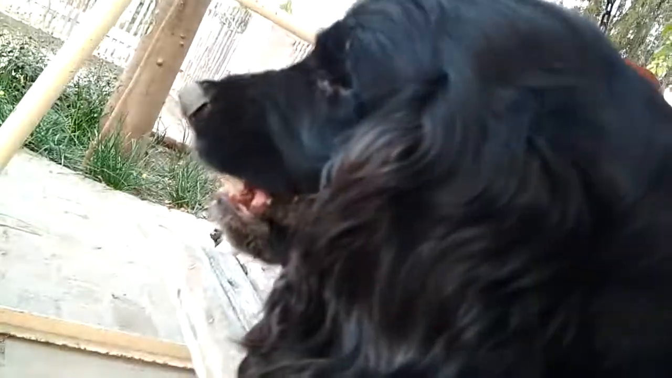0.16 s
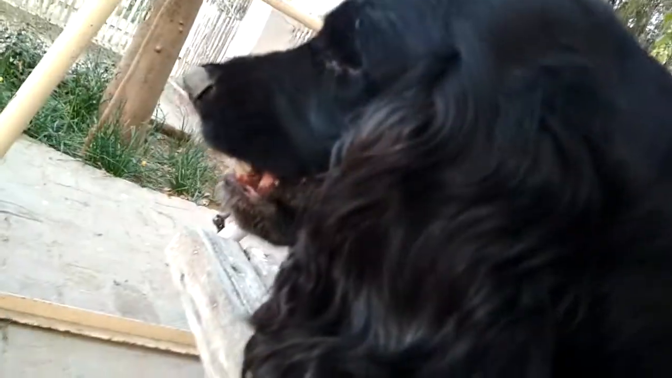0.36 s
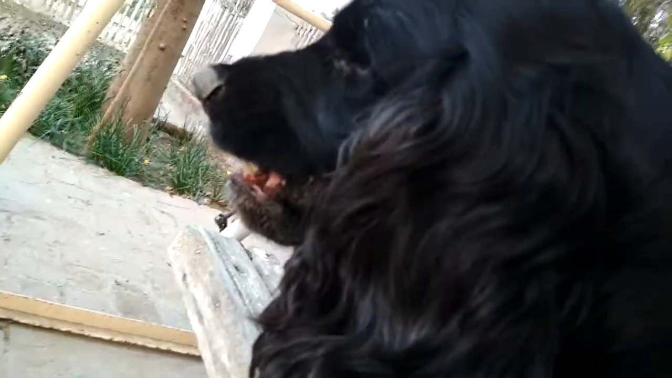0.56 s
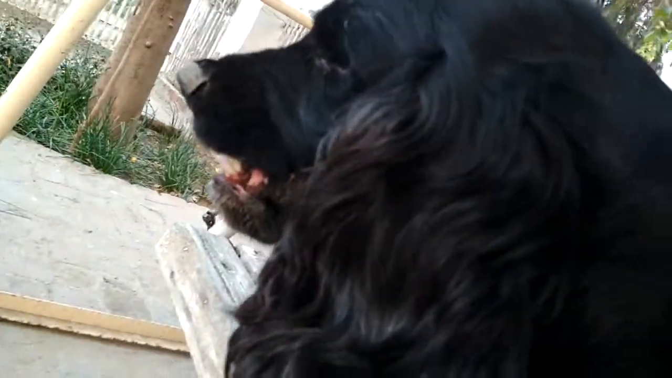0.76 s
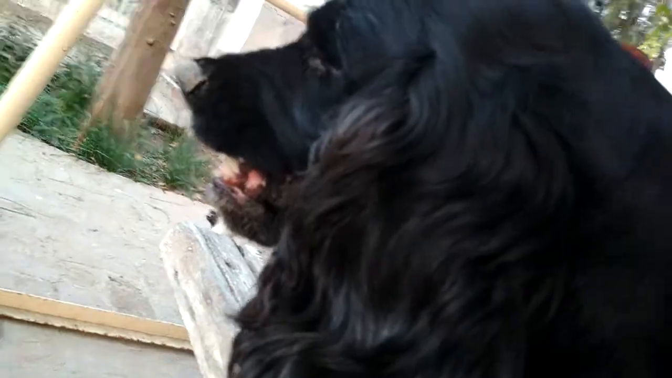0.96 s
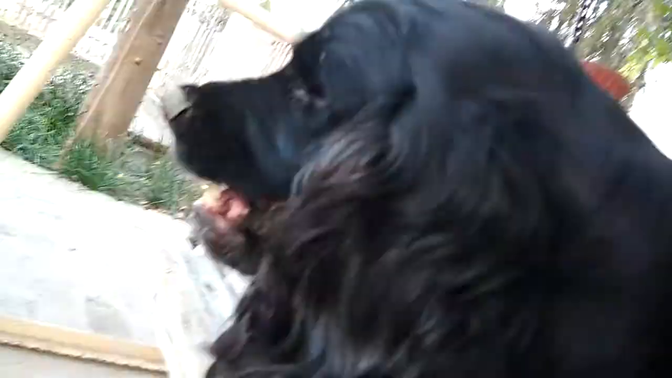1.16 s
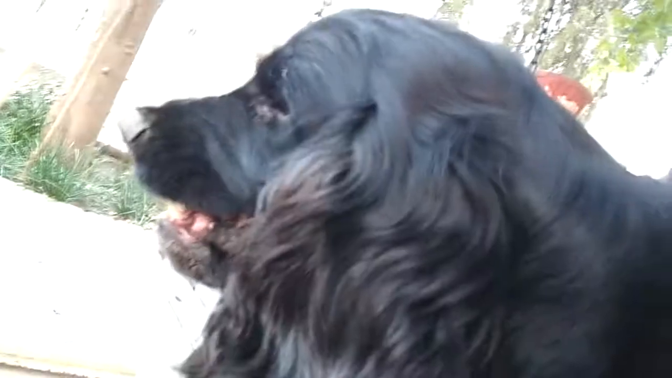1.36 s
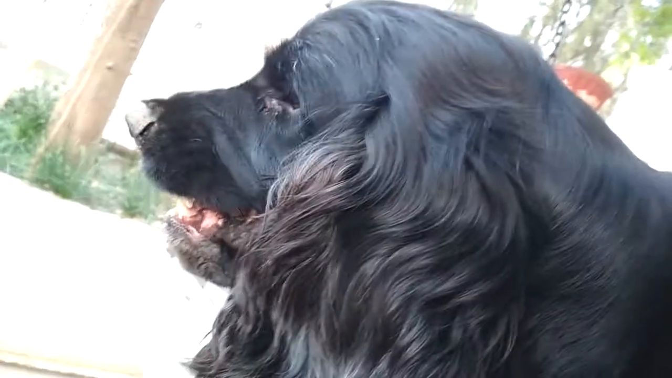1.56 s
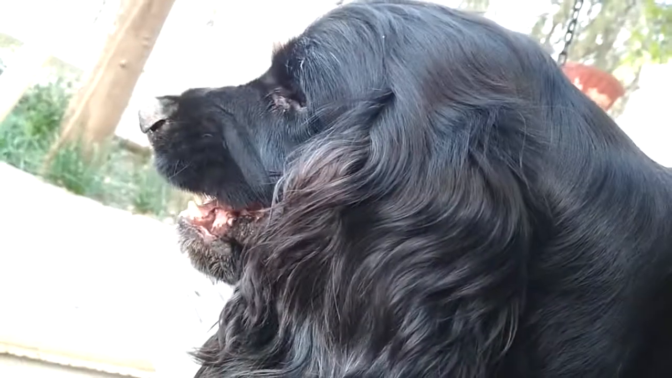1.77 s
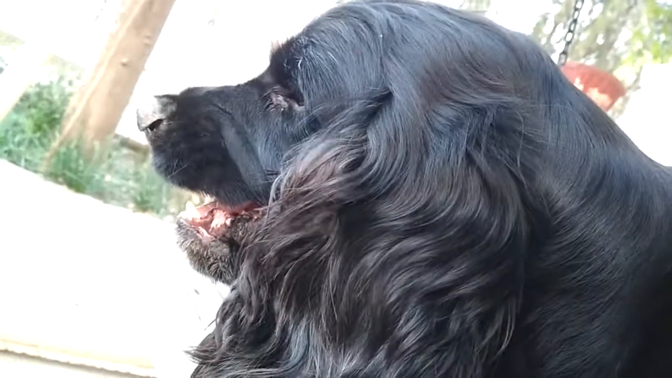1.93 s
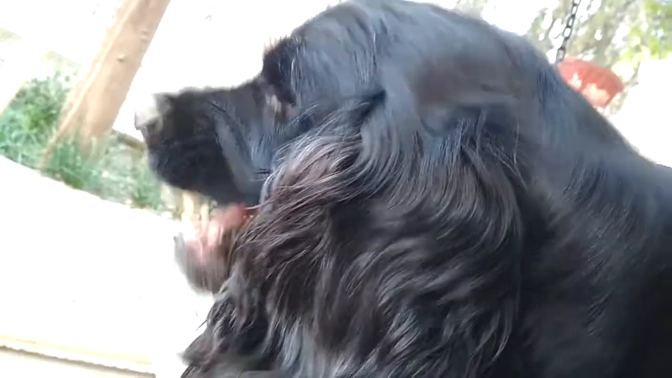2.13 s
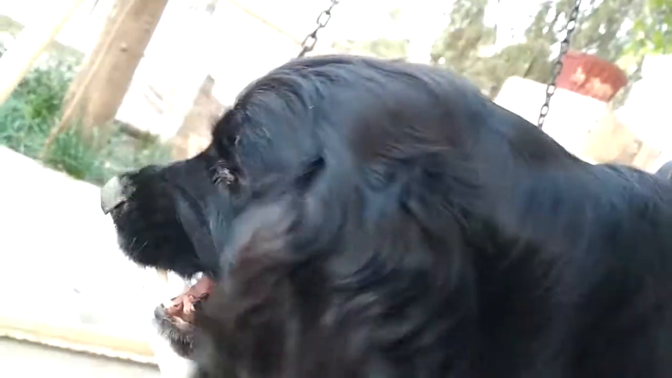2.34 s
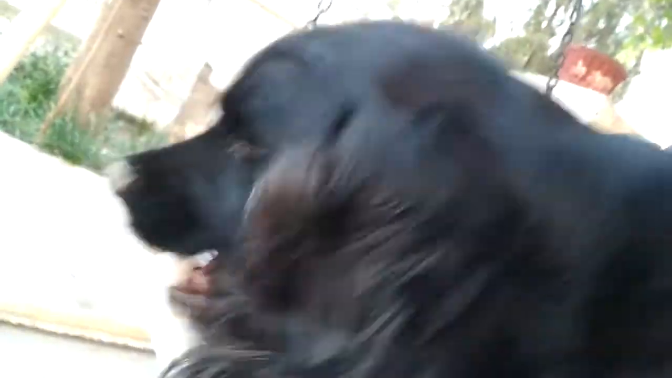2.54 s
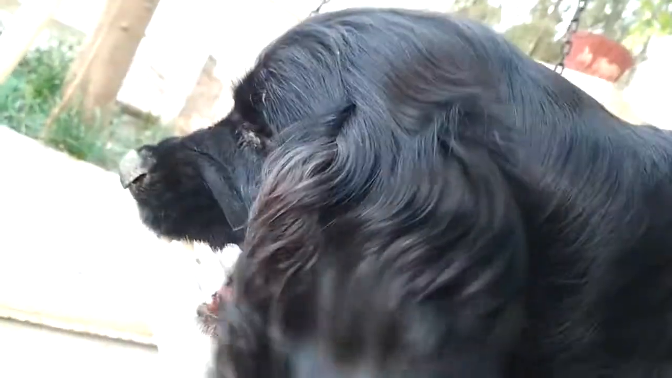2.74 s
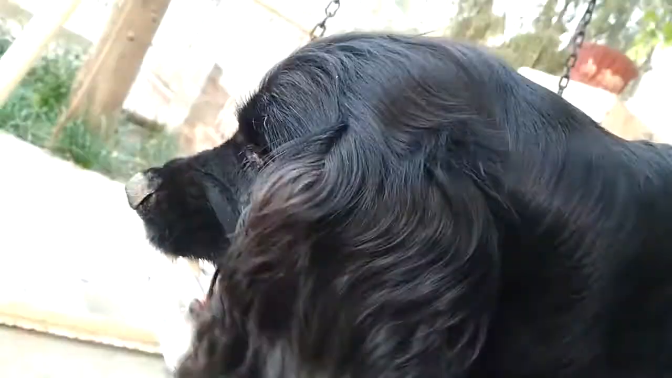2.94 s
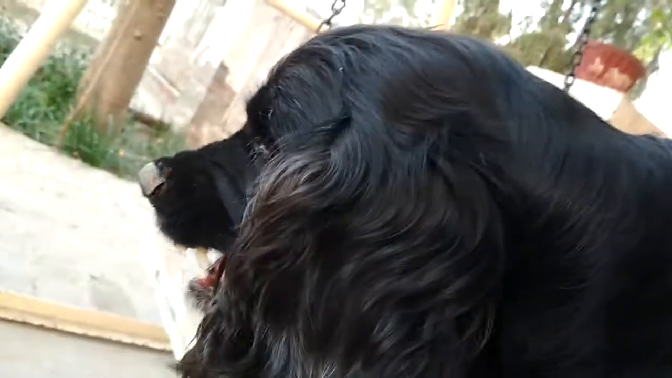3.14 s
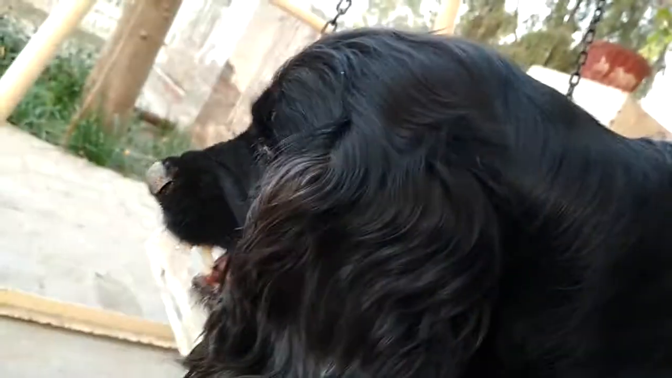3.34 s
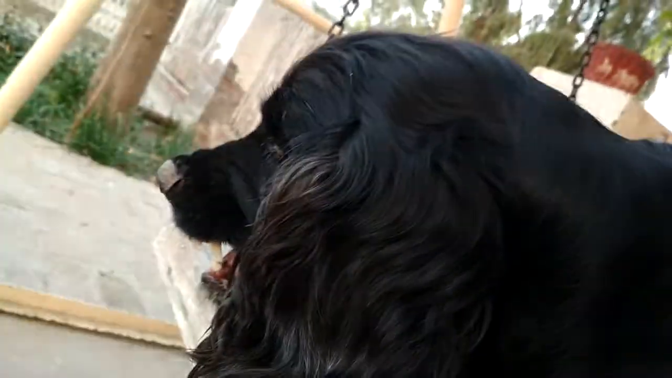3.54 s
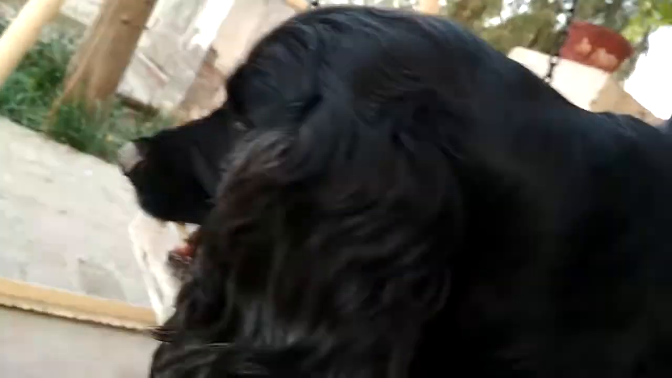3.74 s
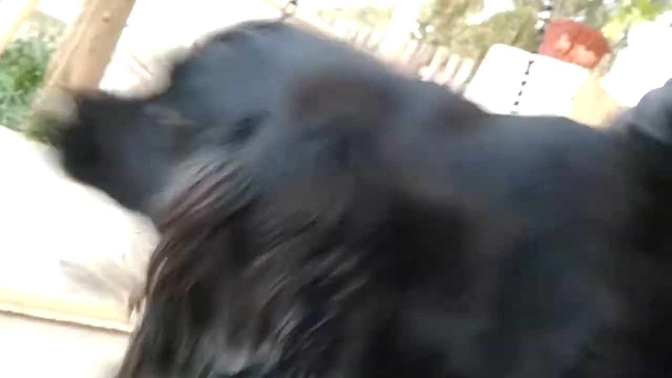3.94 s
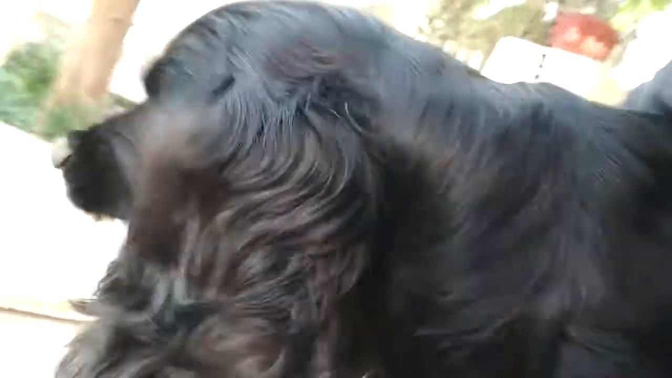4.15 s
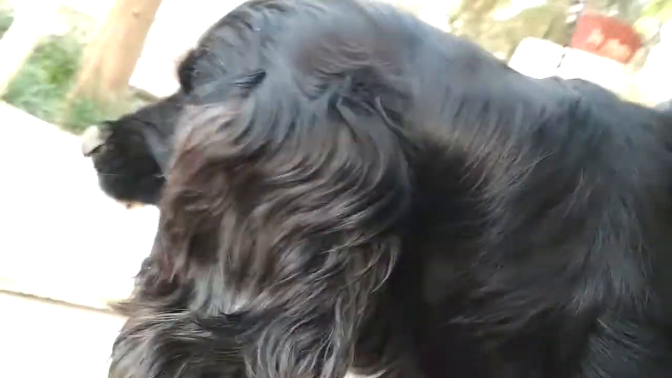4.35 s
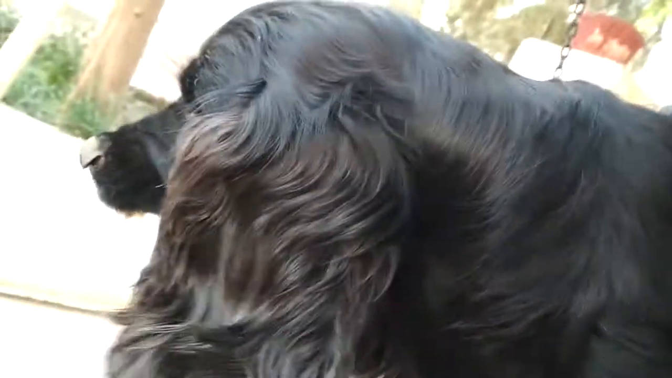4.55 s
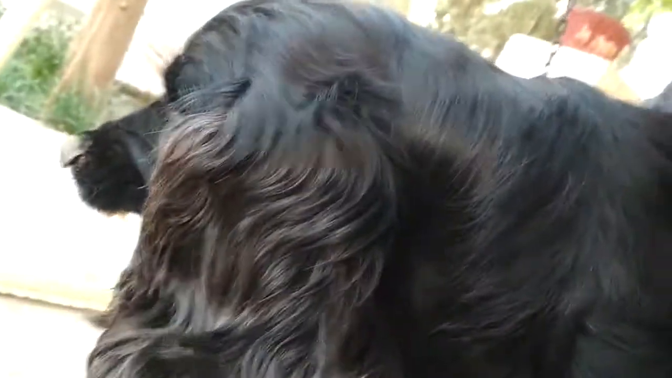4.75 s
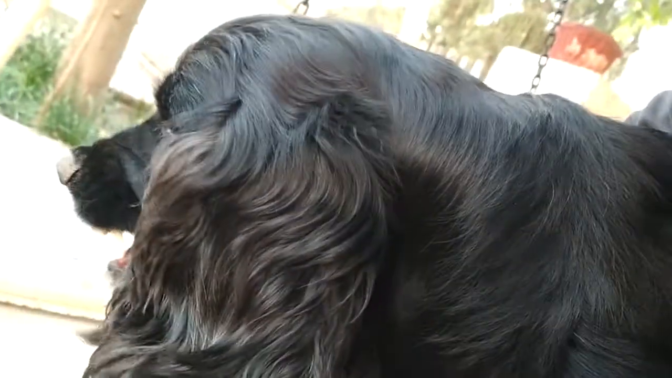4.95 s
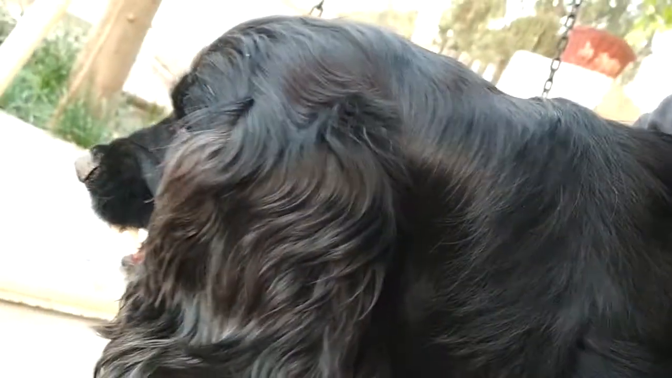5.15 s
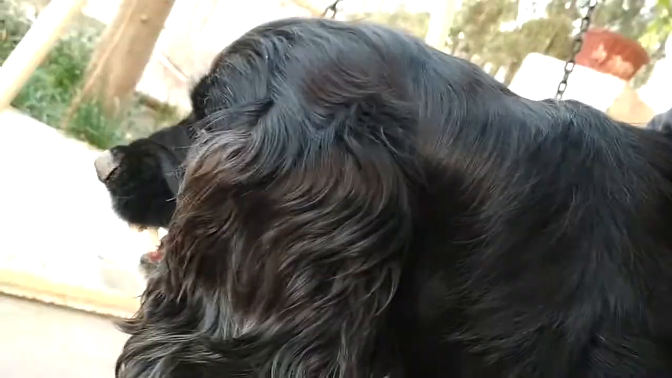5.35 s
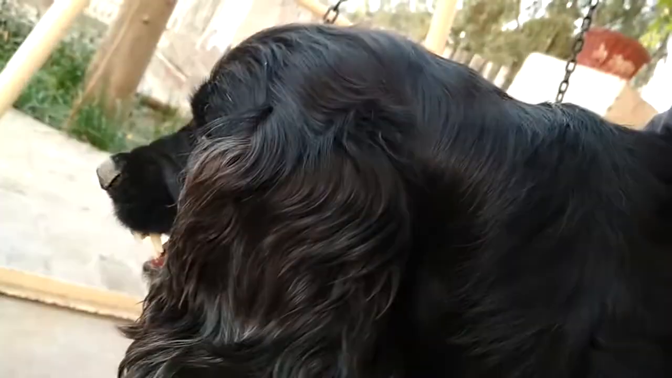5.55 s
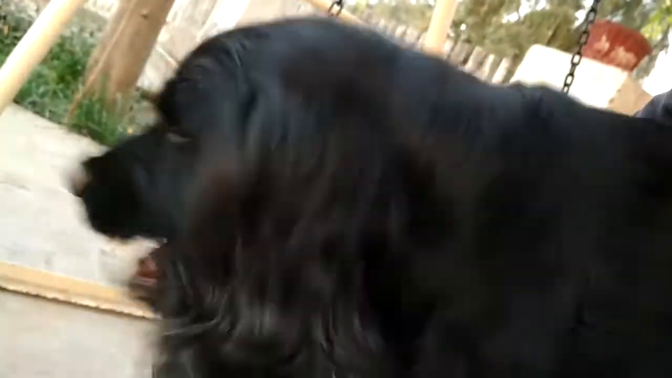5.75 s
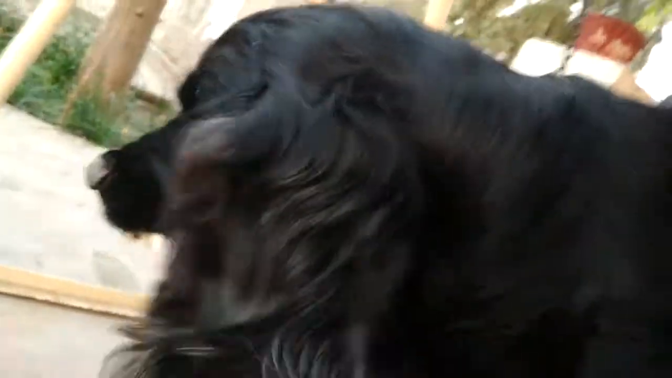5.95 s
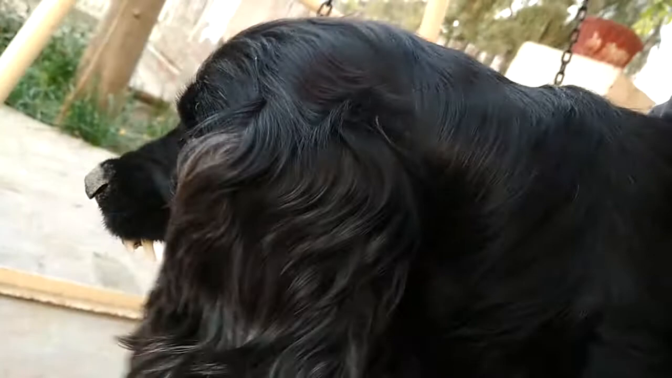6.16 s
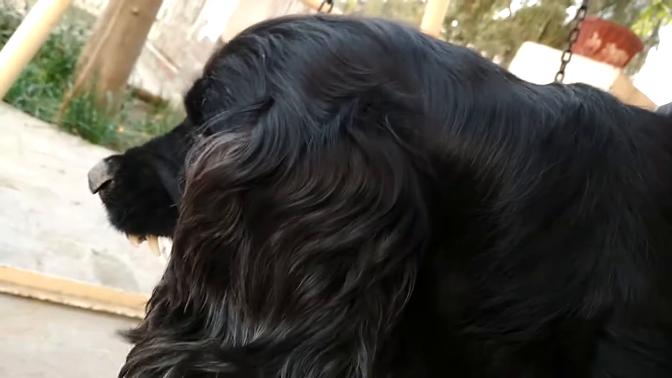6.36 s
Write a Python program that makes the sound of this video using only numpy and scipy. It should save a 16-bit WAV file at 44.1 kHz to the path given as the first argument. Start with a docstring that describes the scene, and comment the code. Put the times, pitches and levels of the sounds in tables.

```python
"""A yard, where a spaniel stands guard close to the two microphone ports of a phone.
Its slack vocal folds rattle in three long growls; drawn tight, they squeal and break into four hoarse
barks. Between them, air dragged in through bared teeth flaps the soft palate in wet, snoring snarls.
Each is a source of pulses or turbulence filtered by chest, throat and mouth. Lips and tongue click now
and then, wind buffets the ports, and paving and walls return a short echo."""
import sys
import numpy as np
from scipy import signal
from scipy.fft import rfft, irfft
from scipy.io import wavfile
from scipy.ndimage import uniform_filter1d

SR = 44100
rng = np.random.default_rng(int(sys.argv[2]) if len(sys.argv) > 2 else 0)


def wav_out(sig):
    """Save sig, one row per channel (or a flat mono array), as 16-bit PCM at SR to the path in sys.argv[1]."""
    wavfile.write(sys.argv[1], SR, np.round(np.clip(np.atleast_2d(sig).T, -1, 1) * 32767).astype(np.int16))


N = 286646
TIME = np.arange(N) / SR

# Spectra. Each row: frequency in Hz, relative level in dB.
YARD_AIR = [(25, -6), (800, -23), (2000, -51), (16000, -32)]
WIND_BUFFET = [(12, -6), (30, 0), (80, -2), (160, -10), (1000, -70)]
LEFT_SHADE = [(100, -0.5), (220, 0), (380, 2), (700, 2), (1300, -4.5), (2400, -1), (4400, -3.5), (8000, -6),
              (12000, -14)]  # the mouth at the left port, against the right
GROWL_CHEST = [(35, -25.5), (70, -9.5), (105, -4.5), (155, -2.5), (225, 3), (320, -3.5), (430, -7.5),
               (1100, -45)]
SNARL_CHEST = [(30, -48), (100, 6), (200, 2.5), (350, 0), (480, -6), (1200, -29)]
CLOSED_TEETH = [(4800, -16), (6100, 1), (9500, 0.5), (11600, 12), (13500, -0.5), (16000, 1)]
BARED_TEETH = [(3500, -52), (5500, -16), (6500, -8.5), (8600, 4), (9600, -2), (11200, 15.5), (12400, 3),
               (13400, 8.5), (16000, -5.5)]
BARK_BODY = [(150, 0), (400, 0), (560, 1), (760, 9), (950, 0), (1300, -14), (2000, -40)]  # lowest resonance of the throat
BARK_THROAT = [(700, -12), (1200, 5), (1550, -4), (1800, 0), (2450, -8), (4200, -22), (8000, -36)]  # its upper resonances
CHAOS_BAND = [(200, -8), (450, -2.5), (1200, 3), (2500, -5)]  # folds in chaotic vibration
JAW_RUSH = [(200, -16.5), (500, 6.5), (1100, 10.5), (1700, 6.5), (2600, 8.5), (6000, -2.5), (9000, -1.5),
            (11500, -0.5), (16000, -9.5)]  # air through the open jaws
JAW_CRACK = [(400, -17), (1100, 7), (2800, -2), (6000, -11), (14000, -10)]  # first blast as they fly open

# Reverberation of the yard. Each row: frequency in Hz, time to fall 60 dB in seconds.
YARD_T60 = [(100, 0.2), (700, 0.36), (3000, 0.38), (14000, 0.22)]
# Gusts at the ports. Each row: centre in seconds, half length in seconds, level in dB.
GUSTS = [(.7, 0.28, -56), (2.86, 0.28, -37), (4.48, 0.051, -40), (6.25, 0.072, -44)]
# Swing of the head. Each row: time in seconds, left minus right level in dB.
HEAD_TURN = [(1.5, 0), (2.3, -0.7), (4.2, 0.3), (5.3, -0.5)]
# Squelches of the tongue. Each row: centre in seconds, level in dB, resonance in Hz.
SQUELCHES = [(1.68, -39.5, 2380), (4.54, -34, 2630), (5.152, -39.5, 2780), (6.32, -27.5, 2321)]
# Single impulses. Each row: time in seconds, relative strength in dB.
LIP_SMACKS = [(1.6387, -8), (1.7134, -10), (1.883, -17), (1.952, -20), (6.2902, -9), (6.41, -7),
              (6.453, -2)]
GRUNTS = [(1.935, -30), (2.011, -25), (2.047, -23), (2.08, -22), (2.113, -19), (2.145, -22), (2.503, -11),
          (2.815, -22.5), (4.012, -17), (6.183, -19)]
THROAT_SLAPS = [(.06, -13), (.165, -15), (.218, -14), (.364, -19.5), (.965, -15), (2.415, -13), (3.243, -7),
                (3.344, -9), (3.42, -8), (4.358, -10), (5.057, -6), (5.148, -9), (6.189, -12),
                (6.467, -14.5)]

# Formants of the mouth. Each row: frequency in Hz, bandwidth in Hz, gain in dB.
SHUT_FORMANTS = [(1150, 390, 9), (1462, 395, 15), (2030, 300, 14), (2750, 600, 11), (6500, 1500, -4)]
CURL_FORMANTS = [(1770, 110, 6.5), (2167, 240, 24), (2620, 220, 7.5), (3410, 160, -2)]
BARED_FORMANTS = [(1200, 300, -1), (1530, 230, 11), (1800, 190, 9), (2200, 300, 3), (3400, 1000, -1.5),
                  (4700, 1000, -6)]

# Growls. Each row: start in seconds, end in seconds.
GROWL_SPANS = [(0, 1.72), (3.04, 4.01), (4.958, 5.73)]
# One curve per growl. Each row: time in seconds, effort in dB, airflow through the teeth in dB.
GROWL_DRIVE = [
    [(0, -32.5, -55), (.14, -34.5, -51.5), (.3, -28, -62), (.85, -31.5, -63), (1.2, -25.5, -56),
     (1.5, -28, -66), (1.61, -44, -66)],
    [(3.05, -60, -48), (3.145, -24.5, -43), (3.3, -26, -39), (3.65, -27.5, -44), (3.78, -26, -56),
     (3.94, -29, -60.5), (4, -23.5, -55)],
    [(4.955, -38, -54), (4.985, -20, -80), (5.04, -26, -38), (5.13, -26.5, -46.5), (5.3, -24, -40.5),
     (5.6, -28.5, -44), (5.72, -23, -50)],
]
# Rate of the folds and main formant in the growls. Each row: time in seconds, frequency in Hz.
GROWL_PITCH = [(0, 117.9), (.3, 98.06), (.7, 92.93), (1.35, 109.8), (2.49, 114.1), (3.05, 103),
               (3.9, 105.5), (5.1, 124.2), (5.33, 109.1)]
GROWL_FORMANT = [(0, 651), (.85, 698), (1.6, 749), (3.1, 700), (3.9, 745), (5, 696.4), (5.7, 720)]
# Swells of the chest. Each row: centre in seconds, half length in seconds, level in dB.
HUMS = [(.37, 0.12, -35), (.69, 0.043, -29), (.85, .04, -30), (.99, 0.046, -33), (1.28, 0.22, -36),
        (2.49, 0.035, -25), (3.22, 0.13, -27.5), (3.53, 0.23, -27), (5.27, 0.17, -30), (5.56, 0.14, -27),
        (6.21, .035, -25.5)]
# Lip curls. Each row: centre in seconds, half length in seconds, level in dB, factor on the formants.
CURLS = [(1.1, .28, -43, 1.018), (5.52, .22, -35.5, 0.9)]
# Air in a wet tooth gap. Each row: centre and half length in seconds, level in dB, resonance in Hz.
SIZZLES = [(.8, 0.41, -50, 6040), (1.97, 0.13, -48, 6000), (5.4, 0.26, -48, 6900)]
# Snarls. Each row: start, full draw, letting go and end in seconds; levels of mouth, chest, rasp and
# hiss in dB; sag of the chest in dB per second.
SNARLS = [(1.8, 2.001, 2.1, 2.108, -36, -34.5, -43.5, -38, -35),
          (2.33, 2.421, 2.44, 2.53, -27, -21.5, -31.5, -30.5, -5),
          (2.721, 2.788, 2.9, 2.997, -27, -40.5, -30.5, -28, 3),
          (4.259, 4.372, 4.54, 4.898, -23, -33, -32.5, -27, -36),
          (5.99, 6.152, 6.46, 6.484, -22.5, -28, -33, -23, 38)]
# Barks. Each row: start, attack, end and release in seconds; voice, punch and rush in dB; delay of the
# jaws in seconds; fall of the voice on release in dB; overtone factor; crack in dB.
BARKS = [(2.155, 0.023, 2.394, 0.14, -20.5, 3, -15.5, 0.0037, 1, 1.1, -23),
         (2.504, 0.0057, 2.715, 0.085, -17.5, 3, -18, .001, 8, .55, -17),
         (3.987, 0.032, 4.31, 0.043, -18.5, 9, -18, 0.013, -5, .5, -27),
         (5.704, 0.035, 6.044, 0.043, -18, 9.5, -18.5, 0.015, -4, .6, -26)]
# One curve per bark. Each row: time in seconds, pitch in Hz, roughness from 0 to 1.
BARK_VOICE = [
    [(2.17, 310, .8), (2.19, 470, .55), (2.21, 520, .55), (2.228, 570, .2), (2.26, 591, .08),
     (2.295, 510, .2), (2.303, 450, .45), (2.318, 440, .3), (2.329, 400, .9), (2.342, 375, .15),
     (2.38, 320, .6)],
    [(2.5, 170, .1), (2.512, 360, .15), (2.523, 460, .2), (2.531, 470, .5), (2.537, 760, .25),
     (2.555, 795, .08), (2.57, 720, .6), (2.597, 560, .25), (2.607, 600, .8), (2.612, 770, .25),
     (2.632, 640, .15), (2.645, 680, .8), (2.67, 780, .6)],
    [(4, 720, .5), (4.025, 750, .35), (4.053, 880, .25), (4.066, 850, .9), (4.078, 770, .3),
     (4.104, 545, .3), (4.112, 560, .75), (4.124, 520, .2), (4.143, 475, .3), (4.154, 600, .9),
     (4.168, 700, .75), (4.174, 500, .45), (4.21, 600, .35), (4.24, 615, .2), (4.263, 530, .35),
     (4.269, 420, .6), (4.305, 360, .15)],
    [(5.725, 740, .4), (5.748, 650, .3), (5.765, 760, .6), (5.782, 838, .15), (5.792, 800, .5),
     (5.812, 710, .35), (5.828, 600, .85), (5.838, 823, .3), (5.853, 760, .4), (5.87, 650, .95),
     (5.9, 660, .55), (5.912, 620, .85), (5.922, 550, .45), (5.948, 670, .45), (5.956, 630, .7),
     (5.968, 600, .15), (5.987, 590, .25), (5.996, 470, .65), (6.01, 420, .3), (6.04, 370, .2)],
]

THROAT_LAG_S, MOUTH_LAG_S, TEETH_LAG_S = .00027, .00026, .00018  # delays at the left port


def from_db(db):
    """Converts decibels to an amplitude ratio."""
    return 10 ** (np.asarray(db) / 20)


def unit(x):
    """Normalises to rms 1."""
    return x / np.sqrt(np.mean(x ** 2) + 1e-20)


def at_hz(points, hz):
    """Interpolates on a log-frequency axis."""
    f, value = np.transpose(points)
    return np.interp(np.log(hz + 1), np.log(f), value)


def track(rows, column=1):
    """Interpolates one column of a table at every sample."""
    rows = np.array(rows)
    return np.interp(TIME, rows[:, 0], rows[:, column])


def ramp(start, end):
    """Linear rise from 0 to 1 between two times."""
    return np.clip((TIME - start) / max(end - start, 1e-3), 0, 1)


def gate(start, end, edge_s=.0011):
    """Trapezoidal window, 1 between two times."""
    return ramp(start - edge_s, start) * (1 - ramp(end, end + edge_s))


def swells(rows):
    """Gaussian envelopes from rows of centre, half length and level."""
    return sum(from_db(db) * np.exp(-((TIME - s) / half_s) ** 2) for s, half_s, db, *_ in rows)


def wander(rate_hz):
    """Random modulation: low-pass noise of rms 1."""
    size = N // 32 + 1
    hz = np.fft.rfftfreq(size, N / size / SR)
    slow = irfft(rfft(rng.standard_normal(size)) * np.exp(-(hz / rate_hz) ** 2), size)
    return unit(np.interp(TIME, np.linspace(0, N / SR, size), slow))


def colour(x, spectrum):
    """Minimum-phase filter with the given spectrum."""
    log_gain = np.log(from_db(at_hz(spectrum, abs(np.fft.fftfreq(4096, 1 / SR)))))
    taps = np.fft.ifft(np.exp(np.conj(signal.hilbert(log_gain)))).real
    return np.apply_along_axis(signal.oaconvolve, -1, x, taps)[..., :N]


def lowpass(x, hz, order):
    """Maximally flat low-pass filter."""
    return signal.sosfilt(signal.butter(order, hz, fs=SR, output="sos"), x)


def resonate(x, hz, widths_hz):
    """Damped resonators in series, one per bandwidth, all following the frequency hz."""
    turn = np.exp(2j * np.pi * np.cumsum(hz * np.ones(N)) / SR)
    for width_hz in widths_hz:
        pole = np.exp(-np.pi * width_hz / SR)
        x = 2 * (turn * signal.lfilter([1 - pole], [1, -pole], x / turn + 1e-18)).real
    return x


def strikes(times, sizes):
    """An impulse train."""
    return np.bincount(np.clip(np.asarray(times) * SR, 0, N - 1).astype(int), sizes, N)


def steadied(x, window_s):
    """Normalises short-time power, so that an envelope alone sets the loudness."""
    window = signal.windows.hann(int(2 * window_s * SR))
    power = signal.oaconvolve((x ** 2).mean(0), window / window.sum(), "same")
    return x / np.sqrt(abs(power) + 1e-4)


def ports(x, lag_s=MOUTH_LAG_S):
    """Path difference and shadowing: the left port hears the dog later and duller than the right."""
    left, right = np.broadcast_to(x, (2, N))
    return np.array([colour(np.roll(left, round(lag_s * SR)), LEFT_SHADE), right])


def steady_pair(x, lag_s, window_s=.11):
    """A layer at the two ports, held at unit power."""
    return steadied(unit(ports(x, lag_s)), window_s)


def outdoor_air():
    """Ambient noise, with low pressure fluctuations where wind meets the ports."""
    hush, buffet = rng.standard_normal((2, 2, N))
    buffet = buffet + .4 * buffet[::-1]  # partly common to both ports
    wind = from_db(-65) + swells(GUSTS)
    return from_db(-74) * unit(colour(hush, YARD_AIR)) + wind * unit(colour(buffet, WIND_BUFFET))


def yard_echo(x):
    """Reverberation: reflections from paving and walls decay exponentially in each band."""
    hz, t, noise = signal.stft(rng.standard_normal((2, SR // 2)), SR, nperseg=256)
    decay = from_db(-60 * t / at_hz(YARD_T60, hz)[:, None]) * (t > .005)
    tail = signal.istft(noise * decay, SR, nperseg=256)[1]
    return signal.fftconvolve(x, tail / np.linalg.norm(tail[0]), axes=1)[:, :N]


def eddies(shared=.29):
    """Turbulent noise, partly coherent between the ports."""
    left, right, both = rng.standard_normal((3, N))
    return np.sqrt(1 - shared) * np.array([left, right]) + np.sqrt(shared) * both


def puffs(clicks, decay_s, leak):
    """Pulsed turbulence: each click releases a decaying burst over a steady leak of air."""
    burst = unit(signal.lfilter([1], [1, -np.exp(-1 / (decay_s * SR))], clicks))
    return (burst + leak) * eddies()


def saliva(per_s, spread_db):
    """Shot noise: sparse snaps of saliva, mostly small."""
    size = from_db(spread_db * np.minimum(rng.exponential(1, N), 3)) * rng.choice([-1, 1], N)
    return unit((rng.random(N) < per_s / SR) * size)


def squelches():
    """Cavity resonance: air squeezed past the wet tongue rings a small pocket of the mouth."""
    fizz = rng.standard_normal((2, N)) * from_db(.74 * wander(140))
    return sum(swells([(s, .0084, db)]) * unit(ports(resonate(fizz, hz, widths_hz=[940, 810])))
               for s, db, hz in SQUELCHES)


def smacks():
    """Film rupture: saliva snaps at the teeth in brief bursts of noise."""
    s, db = np.transpose(LIP_SMACKS)
    snap = colour(puffs(strikes(s, from_db(db)), decay_s=.0012, leak=0), BARED_TEETH)
    return ports(snap * from_db(db.max() - 6.5) / abs(snap).max())


def grunts():
    """Impulse response of the chest, shaken by single heavy flaps."""
    s, db = np.transpose(GRUNTS)
    thud = lowpass(colour(strikes(s, from_db(db)), SNARL_CHEST), 600, order=2)
    return ports(thud * from_db(db.max()) / abs(thud).max())


def slaps():
    """Free vibration: hard closures of the throat ring the mouth, dulled by the closed lips."""
    s, db = np.transpose(THROAT_SLAPS)
    ring = resonate(strikes(s, from_db(db)), 708, widths_hz=[50])
    ring = lowpass(resonate(ring, 490, widths_hz=[550]), 1400, order=2)
    return ports(ring * from_db(db.max() - 2.5) / abs(ring).max())


def throat_hold(hold_s=.008, depth=.55):
    """Occlusion: the pulses weaken just before each slap, as the throat shuts and pressure builds."""
    shut = sum(np.exp(-((TIME - s + hold_s) / hold_s) ** 4) for s, _ in THROAT_SLAPS)
    return 1 - np.clip(depth * shut, 0, 1)


def flaps(rate_hz, jitter_s, spread_db=2):
    """Jitter and shimmer: slack tissue closes unevenly in time and strength, at steady mean power."""
    times = TIME[1:][np.diff(np.floor(np.cumsum(rate_hz) / SR)) > 0]
    late, size = rng.standard_normal((len(times), 2)).T
    size = from_db(spread_db * size)
    return strikes(times + jitter_s * late, size / np.sqrt(uniform_filter1d(size ** 2, size=7)))


def lip_flutter(rate_hz, unsteady):
    """Near-periodic oscillation of loose lips, between -1 and 1."""
    return np.cos(2 * np.pi * np.cumsum(rate_hz * (1 + unsteady * wander(10.3))) / SR)


def cavities(x, formants, drift, waver_db, stretch=1):
    """Parallel formants, each drifting in frequency and strength as tongue and lips move."""
    out = 0
    for hz, width_hz, db in formants:
        moving_hz = stretch * hz * (1 + drift * wander(24))
        ring = resonate(x, moving_hz, widths_hz=[width_hz, 2 * width_hz])
        out = out + from_db(db + waver_db * wander(6.6)) * ring
    return out


def blend(gains, layers):
    """Superposition of mouth, chest, rasp and hiss, each under its own envelope."""
    lags_s = MOUTH_LAG_S, TEETH_LAG_S, MOUTH_LAG_S, TEETH_LAG_S
    return sum(gain * steady_pair(layer, lag_s) for gain, layer, lag_s in zip(gains, layers, lags_s))


def snarl_gains(start, full, let_go, end, mouth_db, chest_db, rasp_db, hiss_db, sag_db_per_s):
    """Envelopes of one draw of air: the palate drops to a faint flutter, the hiss dies ever faster."""
    swell = ramp(start, full) - 1
    air_db = 19.5 * swell - 20.5 * ramp(let_go, end) ** 2.97
    palate_db = 15 * swell - 26 * ramp(let_go, let_go + .068)
    sag_db = sag_db_per_s * (np.clip(TIME, full, let_go) - full)
    levels_db = [mouth_db + palate_db, chest_db + palate_db - sag_db,
                 rasp_db + .45 * palate_db + .55 * air_db, hiss_db + air_db]
    return gate(start + .02, end, edge_s=.02) * from_db(levels_db)


def snarl(idle_hz=28.15, hz_per_gain=634.4):
    """Flow-induced flutter: indrawn air flaps the soft palate and hisses wetly between the teeth."""
    gains = sum(snarl_gains(*row) for row in SNARLS)
    flap_hz = (idle_hz + hz_per_gain * gains[0]) * np.exp(.18 * wander(30))  # faster when louder
    palate = flaps(flap_hz, jitter_s=.0015) * throat_hold()
    lips = lip_flutter(rate_hz=27.5, unsteady=.1246)
    air = unit(puffs(palate, decay_s=.009, leak=.4))
    mouth = resonate(unit(palate) + 2 * air[0], 758, widths_hz=[173])
    mouth = lowpass(resonate(mouth, 780, widths_hz=[300]), 1050, order=3)
    chest = colour(unit(palate) + 2.24 * air[1], SNARL_CHEST)
    wet = unit(puffs(palate, decay_s=.006, leak=.8)) + .6 * saliva(per_s=200, spread_db=4)
    rasp = cavities(wet * from_db(2.8 * lips), BARED_FORMANTS, drift=.012, waver_db=4)
    jet = unit(puffs(palate, decay_s=.0037, leak=7.2)) + .47 * saliva(per_s=620, spread_db=4)
    hiss = colour(jet, BARED_TEETH) * from_db(3.5 * lips + 2 * wander(43))
    return blend(gains, [mouth, chest, rasp, hiss])


def growl_gains():
    """Power laws: effort and airflow set the envelopes of mouth, chest, rasp and hiss."""
    gains = 0
    for (start, end), curve in zip(GROWL_SPANS, GROWL_DRIVE):
        effort_db, airflow_db = track(curve), track(curve, column=2)
        opening_db = 4 * ramp(start, end) ** 2  # the jaws part towards the end
        chest_db = .51 * effort_db + .23 * airflow_db - 7.5
        rasp_db = .61 * effort_db + .34 * airflow_db + opening_db - 13
        gains = gains + gate(start, end) * from_db([effort_db + 2.73, chest_db, rasp_db, airflow_db + 3])
    return gains


def lip_curls(wet):
    """Cavity resonance: wet breath rings the space behind the curled lips."""
    ring = cavities(wet, CURL_FORMANTS, drift=.04, waver_db=1, stretch=track(CURLS, column=3))
    return swells(CURLS) * steady_pair(ring, MOUTH_LAG_S)


def sizzles(wet):
    """Frication: air sizzles through a wet gap between the teeth."""
    gap = resonate(wet, track(SIZZLES, column=3), widths_hz=[1800, 2000, 2200])
    return swells(SIZZLES) * steady_pair(gap, TEETH_LAG_S)


def growl():
    """Source and filter: slack folds rattle, the chest hums at their rate, the nearly shut mouth rings."""
    formant_hz = track(GROWL_FORMANT) * (1 + .011 * wander(15))
    pitch_hz = track(GROWL_PITCH) * (1 + .035 * wander(20))
    folds = flaps(pitch_hz, jitter_s=.00055)
    lips = lip_flutter(rate_hz=25.16, unsteady=.05)
    rattle = folds * from_db(.89 * lips) * throat_hold()
    air = unit(puffs(rattle, decay_s=.006, leak=.25))
    mouth = resonate(unit(rattle) + .7 * air[0], formant_hz, widths_hz=[95, 480])
    mouth = lowpass(mouth, 1020, order=6)
    chest = colour(unit(folds) + air[1], GROWL_CHEST) * from_db(2 * wander(31))
    phase = 2 * np.pi * np.cumsum(pitch_hz) / SR + .3 * wander(60)
    hum = swells(HUMS) * unit(np.sin(phase) * from_db(2 * wander(35)))
    spurts = unit(puffs(rattle, decay_s=.006, leak=.3) * from_db(3.6 * lips + 3.4 * wander(45)))
    wet = spurts + .1 * unit(rattle) + .15 * saliva(per_s=200, spread_db=3)
    hiss = colour(puffs(folds * from_db(3.9 * lips), decay_s=.0067, leak=.26), CLOSED_TEETH)
    rasp = cavities(wet, SHUT_FORMANTS, drift=.031, waver_db=5.5)
    throat = blend(growl_gains(), [mouth, chest, rasp, hiss])
    return throat + ports(hum, TEETH_LAG_S) + lip_curls(wet) + sizzles(wet)


def bark_gains(start, attack_s, end, release_s, voice_db, punch_db, rush_db,
               jaw_delay_s, fall_db, overtone_factor, crack_db):
    """Envelopes of voice, rush, overtones and crack in one bark: fast attack, exponential decay."""
    top, onset_db = start + attack_s, 24.5
    age_s = np.maximum(TIME - top, 0)
    closing = ramp(end - release_s, end)
    push_db = punch_db * np.exp(-age_s / .04)  # the first push of air is the hardest
    folds_db = onset_db * (ramp(start, top) - 1)
    jaws_db = onset_db * (ramp(start + jaw_delay_s, top + jaw_delay_s) - 1)
    voice = from_db(voice_db + folds_db + push_db - 17.5 * age_s - fall_db * closing)
    rush = from_db(rush_db + jaws_db + .083 * push_db - 30.5 * age_s - 18.5 * closing)
    crack = from_db(crack_db + jaws_db - 250 * np.maximum(age_s - jaw_delay_s, 0))
    window = gate(start, end - .008, edge_s=.008)
    return window * np.array([voice, rush, np.full(N, overtone_factor), crack])


def bark():
    """Nonlinear vibration: tight folds squeal and break into chaos; the open jaws add crack and rush."""
    voice_gain, rush_gain, overtone_gain, crack_gain = sum(bark_gains(*row) for row in BARKS)
    curve = np.vstack(BARK_VOICE)
    rough = np.clip(track(curve, column=2), 0, 1)
    pitch_hz = track(curve) * (1 + (.008 + .06 * rough) * wander(150))
    phase = 2 * np.pi * np.cumsum(pitch_hz) / SR
    torn_phase = phase + (.04 + .26 * rough) * wander(230)
    beat = 1 + .6 * rough * np.cos(phase / 2) + .7 * rough * wander(180)  # period doubling and noise
    harmonics = sum(np.cos(k * torn_phase) for k in range(2, 13)) * from_db(3 * wander(70))
    chaos = resonate(rng.standard_normal(N), 544, widths_hz=[100])
    chaos = unit(colour(resonate(chaos, 874, widths_hz=[120]), CHAOS_BAND))
    folds = (np.cos(phase) + .55 * overtone_gain * harmonics) * beat
    window_s = .011
    tone = steadied(unit(colour(folds, BARK_BODY))[None], window_s)
    voice = np.sqrt(1 - rough ** 2) * tone + 1.2 * rough ** 2 * chaos
    overtones = unit(colour(harmonics * beat, BARK_THROAT))
    rush = unit(colour((1 + 2 * np.cos(phase)) * eddies(), JAW_RUSH))
    rasp = 6.5 * overtone_gain * (1 - .7 * rough) * overtones + (1.25 + 1.9 * rough) * rush
    crack = unit(colour(eddies(), JAW_CRACK)) + .27 * overtones
    shimmer = from_db(1.5 * wander(90))
    return (voice_gain * from_db(-3 * rough) * steady_pair(voice, THROAT_LAG_S, window_s)
            + rush_gain * shimmer * steady_pair(rasp, TEETH_LAG_S, window_s)
            + crack_gain * steady_pair(crack, TEETH_LAG_S, window_s))


def scene():
    """Superposition of the dog's direct sound, its echo and the open air."""
    dog = growl() + snarl() + bark() + slaps() + grunts() + smacks() + squelches()
    dog = dog * from_db(np.outer([.5, -.5], track(HEAD_TURN)))
    return dog + from_db(-13) * yard_echo(dog) + outdoor_air()


def record(dry):
    """Soft saturation in the microphone rounds the highest peaks; a low-pass limits the band."""
    ceiling, edge_hz = .65, 16050
    rounded = dry / (1 + (dry / ceiling) ** 4) ** .25
    taps = signal.firwin(511, edge_hz, window=("kaiser", 9), fs=SR)
    return signal.oaconvolve(rounded, taps[None], "same")


dry = scene()
out = record(dry)
wav_out(out)
```